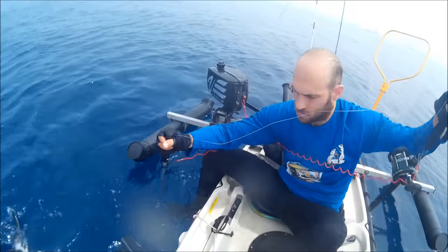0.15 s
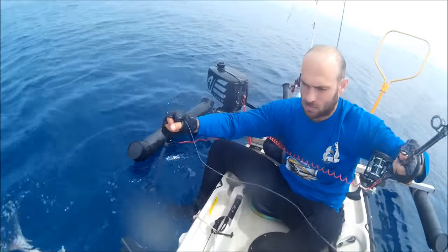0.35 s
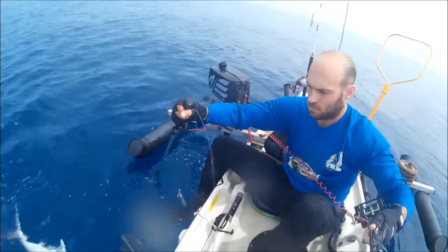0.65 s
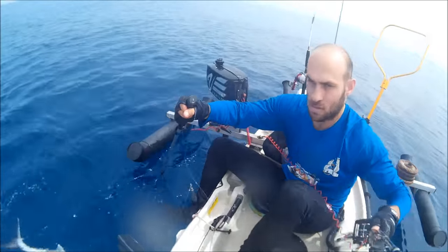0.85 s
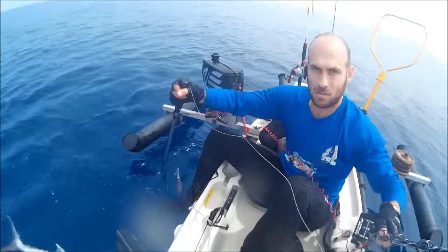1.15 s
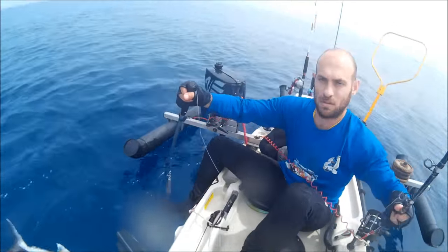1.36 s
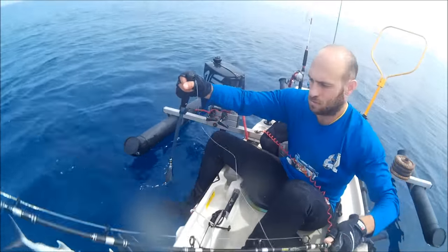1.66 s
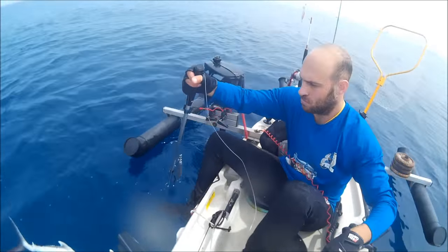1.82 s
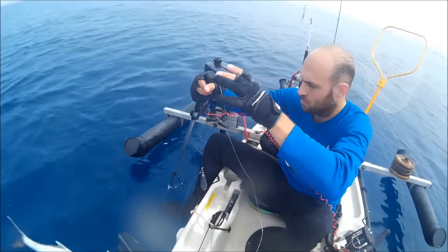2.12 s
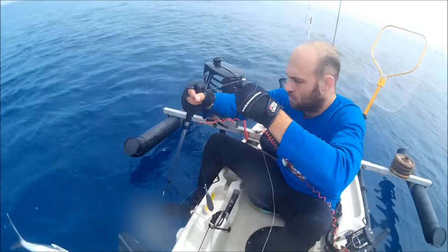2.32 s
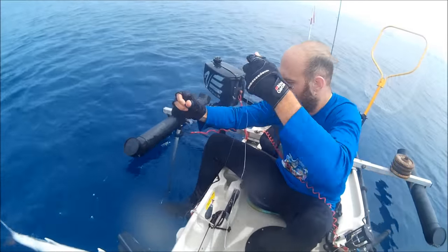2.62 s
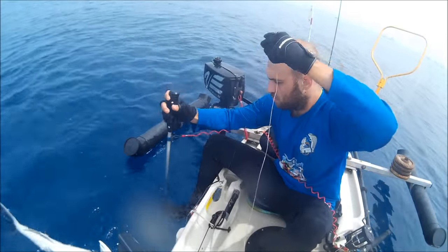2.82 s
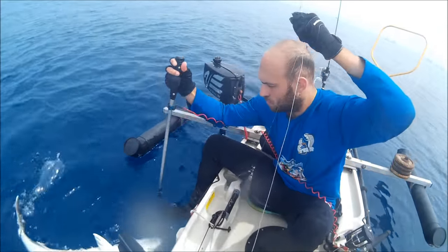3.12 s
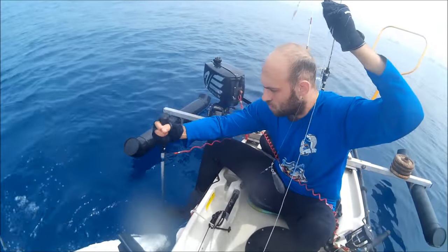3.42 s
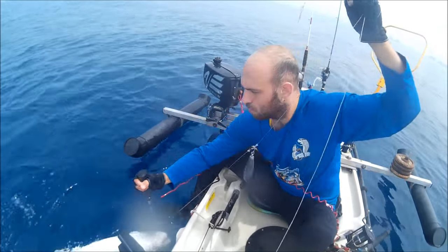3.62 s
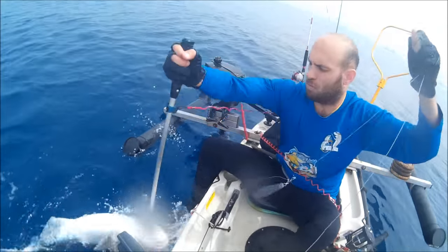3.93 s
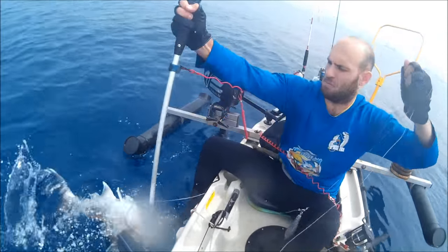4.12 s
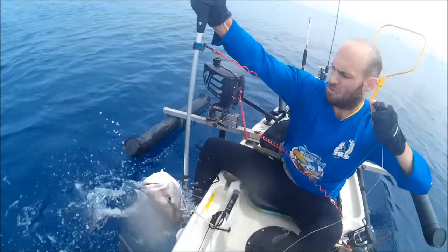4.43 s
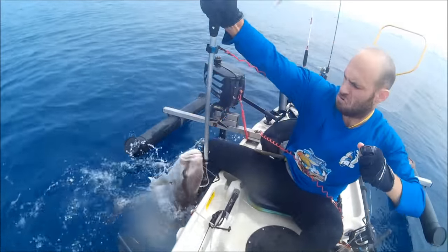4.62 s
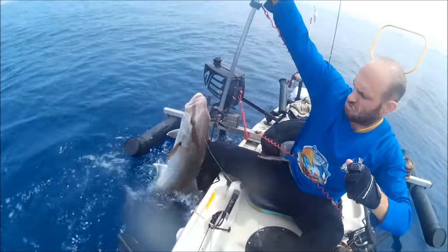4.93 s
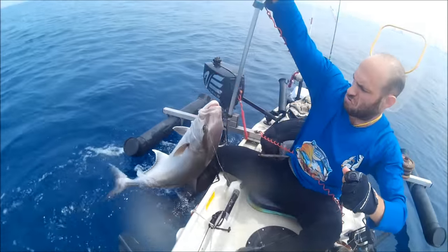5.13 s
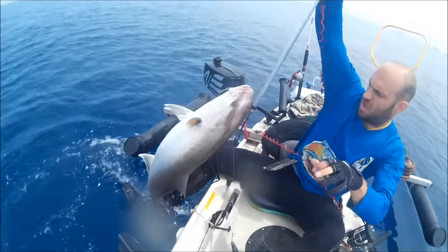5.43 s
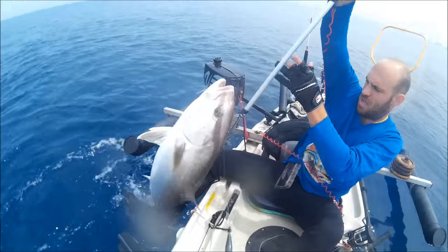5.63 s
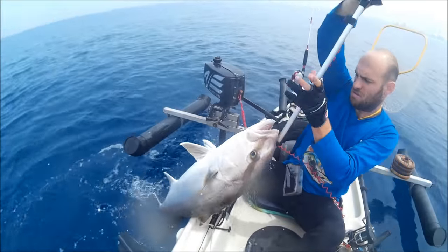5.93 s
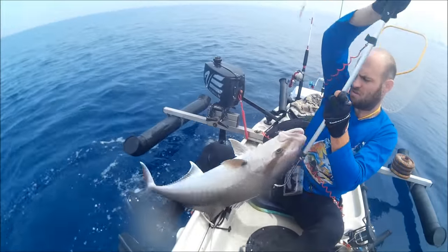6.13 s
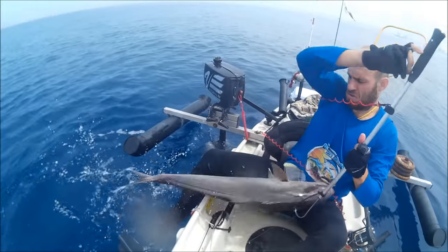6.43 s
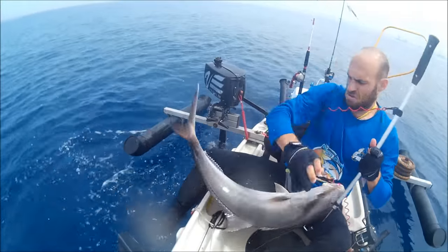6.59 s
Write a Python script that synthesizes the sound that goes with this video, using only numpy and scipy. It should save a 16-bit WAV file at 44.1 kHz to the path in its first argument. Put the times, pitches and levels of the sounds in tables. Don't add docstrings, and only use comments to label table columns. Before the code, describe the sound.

On open water, a sealed microphone fixed to a plastic kayak hears mostly through the hull. A rod and reel clatter violently, clipping the input, then the reel ratchets and bumps into place. Hollow gaff knocks thin out into near quiet with faint hiss, before line ticks, splashy rubbing and heavy fish thuds drum on the hull until the end.

```python
import sys
import numpy as np
from scipy import signal
from scipy.fft import rfft, irfft
from scipy.io import wavfile

SR = 44100
rng = np.random.default_rng(int(sys.argv[2]) if len(sys.argv) > 2 else 0)


def log_audio(samples):
    frames = np.atleast_2d(samples).T
    limited = np.clip(frames, -1, 1)
    pcm = np.round(limited * 32767).astype(np.int16)
    wavfile.write(sys.argv[1], SR, pcm)


def field_ratio(decibels):
    return 10 ** (np.asarray(decibels, dtype=float) / 20)


N = 298098

# pitch_hz, density_db
HISS_SPECTRUM = [(18, -42.5), (30, -11.5), (149, -1.5), (437, -10.5), (569, -13), (988, -17), (1220, -19.5),
                 (5000, -27), (14000, -27), (15200, -27), (16300, -43.5)]
# pitch_hz, level_db, t60_s
HULL_BOOM = [(101, -2, 0.23), (149.25, -0.5, .2), (180, -5, 0.13), (215, -8, 0.099), (268, 0.5, 0.043),
             (353, -8, 0.025), (383.7, -17.5, 0.08)]
HULL_KNOCK = [(476, -1.5, 0.13), (552, 0.5, 0.11), (622.2, -7.5, 0.078), (752.3, 5, 0.075),
              (822, -1, 0.084), (927.5, -10, 0.15)]
HULL_CLACK = [(1268, -12.5, 0.046), (1420, -11.5, 0.052), (1627, 2.5, 0.011), (1747, -2, 0.029),
              (2061, -13.5, 0.012), (2250, -19.5, 0.0042)]
HULL_SNAP = [(2590, -13.5, 0.024), (3000, -10.5, 0.0081), (3720, -7, 0.057), (4200, -14, 0.016)]
# pitch_hz, level_db, t60_s
MOUNT_BOOM = [(69.6, -11.5, 0.065), (150, 2.5, 0.058), (190.4, 1, 0.086), (280, 7.5, 0.033)]
MOUNT_KNOCK = [(366, -7.5, 0.0099), (504.5, -11, 0.062), (646.2, 4, 0.048), (750, 7.5, 0.034),
               (864, -4.5, 0.04)]
MOUNT_CLACK = [(1245, 0, 0.021), (1400, -3.5, 0.034), (1560, 0.5, 0.021), (1732, 2.5, 0.014),
               (1966, 0.5, 0.018), (2297, -5, 0.016)]
MOUNT_SNAP = [(2657, -1.5, 0.0099), (3220, 5, 0.0086), (4200, -3.5, 0.012), (5130, -13.5, 0.0055),
              (6700, -13.5, 0.0034), (10200, -14, 0.0015), (13550, -13.5, 0.001)]
# start_s, level_db, fall_db_per_s
JOLTS = [
    (0.0, -37, 76),
    (.57, -22.5, 227.5),
    (.95, -10.5, 293),
    (1.119, -30, 43),
    (1.45, -41.5, 48),
    (3.961, -56, 22),
    (6.56, -49.5, 10.0),
]
CALM_DB = (-67.5, -66.5, -76.5)
RELEASE_DB_PER_S = (700, 400.5, 502.5)
# start_s, end_s, knock_db, boom_db, clack_db
STROKES = [(0.147, 0.275, -57, -47, -61), (0.348, 0.375, -66, -54, -77), (0.437, 0.505, -71, -40.5, -79),
           (0.52, 0.768, -33.5, -34.5, -43), (0.86, 1.247, -49, -33, -55.5),
           (1.289, 1.56, -60, -43.5, -61.5), (1.592, 1.835, -40.5, -38, -42),
           (1.886, 2.279, -50.5, -45.5, -57.5), (3.31, 3.602, -59.5, -62, -67),
           (3.872, 4.259, -60, -48.5, -62.5), (3.995, 4.157, -58, -64, -55),
           (4.295, 4.593, -54.5, -51.5, -63), (4.58, 4.727, -58, -34, -76),
           (4.812, 4.97, -52.5, -50, -66.5), (4.954, 5.105, -39.5, -32.5, -63.5),
           (5.11, 5.244, -58, -48, -66), (5.243, 5.545, -44, -34.5, -64.5), (5.552, 6.007, -48, -36, -68),
           (6.031, 6.544, -59.5, -43, -69), (6.543, 6.757, -49, -46.5, -56.5)]
# start_s, fall_db_per_s, knock_db, boom_db, clack_db
SLAPS = [
    (0.0, 154.5, -47.5, -30, -47.5),
    (1.678, 81, -37, -31.5, -58),
    (2.469, 67, -61.5, -30, -69),
    (5.536, 69, -35.5, -38, -55.5),
]
# start_s, end_s, pitch_hz, width_hz,
# level_db
RASPS = [(0.526, 0.573, 2100, 500, -22), (0.927, 0.997, 3500, 3000, -45.5), (1.65, 1.68, 4350, 3870, -71),
         (2.46, 2.499, 3000, 2400, -55.5), (4.668, 4.706, 3000, 2100, -64), (5.3, 5.47, 3020, 120, -72),
         (5.38, 5.78, 1740, 1100, -69.5), (.001, 0.15, 3100, 4000, -64), (5.524, 5.595, 1940, 110, -54),
         (5.545, 5.76, 2130, 250, -68), (0.36, .52, 96, 32, -33), (0.00077, 0.11, 101, 42, -42.5),
         (1.28, 1.66, 95, 25, -37.5), (4.18, 4.25, 3100, 280, -72), (1.55, 1.86, 4400, 200, -73),
         (2.76, 2.98, 107, 43, -55.5)]
# start_s, level_db
RATCHET = [(1.293, -37), (1.321, -27), (1.3416, -35), (1.3903, -27), (1.4506, -32.5), (1.4662, -25),
           (1.484, -38), (1.535, -33), (1.5279, -26), (1.578, -36), (1.59, -34), (1.6195, -43),
           (1.652, -31), (1.672, -31), (1.708, -34.5), (1.724, -41), (1.399, -34), (1.6256, -28),
           (1.6596, -22.5), (1.7423, -37), (1.8153, -49), (1.9455, -49.5), (2.0232, -48), (2.067, -54),
           (2.1136, -45), (2.1385, -48), (2.155, -41), (2.1863, -47), (2.25, -52), (2.2694, -49),
           (2.3705, -49.5), (2.4224, -52)]
# start_s, level_db
LINE_TICKS = [(0.0064, -36.5), (0.0193, -34.5), (0.04, -36), (0.071, -41.5), (0.0936, -45), (0.113, -46),
              (0.138, -44.5), (0.171, -50), (0.2064, -63), (0.2227, -43.5), (0.247, -45), (0.272, -53),
              (0.303, -51), (0.365, -51), (3.743, -52.5), (3.9258, -47), (4.292, -49), (4.363, -45.5),
              (4.4093, -41.5), (4.486, -49.5), (4.5293, -42.5), (4.654, -54), (4.675, -45.5), (4.6883, -43),
              (6.0849, -51), (6.357, -50), (6.5554, -52)]
# start_s, knock_db, boom_db, clack_db, spot_hz
REEL_BUMPS = [(0.19, -29, -43, -40, 156), (0.271, -38, -46, -62, 166), (0.371, -43, -49, -53.5, 280),
              (1.313, -37, -23.5, -36, 233), (1.342, -34.5, -59, -27, 94.2), (1.39, -23, -22, -29, 111),
              (1.464, -27.5, -29.5, -57, 101), (1.526, -35.5, -25.5, -35, 133),
              (1.577, -27.5, -35, -31.5, 99.6), (1.626, -44, -59, -31, 96), (1.695, -26, -20, -27.5, 162),
              (1.815, -23.5, -43, -23, 154), (1.846, -24, -21, -59.5, 160.5), (2.0, -30, -58, -36.5, 163),
              (2.089, -18.5, -23, -24.5, 166.5), (2.193, -27.5, -45, -40, 236),
              (2.258, -35.5, -64, -42, 158), (1.662, -25, -25.5, -45, 198), (1.779, -27, -22, -31, 162)]
# start_s, knock_db, boom_db, clack_db, spot_hz
GAFF_BUMPS = [(2.426, -36, -42, -44, 161), (2.452, -19.5, -15, -29, 170), (2.534, -36, -21, -46.5, 165.5),
              (2.597, -29, -31, -42.5, 158), (2.686, -33, -35, -53.5, 163), (2.703, -37, -23, -63, 167.4),
              (3.02, -53, -48, -51.5, 137.3), (3.303, -39.5, -49, -52, 167.4),
              (3.786, -46.5, -68, -54.5, 145.6), (3.845, -40, -51, -47.5, 263),
              (3.899, -43, -34.5, -63, 172), (4.015, -31.5, -34.5, -69, 164.2),
              (4.063, -35, -40, -41.5, 194), (4.114, -30, -60.5, -44, 88.4),
              (4.177, -36, -35.5, -69.5, 164), (4.336, -52, -43, -40, 180), (4.357, -30, -61, -79, 156),
              (4.432, -30.5, -39, -58, 276.6), (2.611, -44, -24, -60, 155), (4.224, -46, -44, -42, 160.7),
              (4.077, -38, -54, -43, 163)]
# start_s, knock_db, boom_db, clack_db, spot_hz
FISH_BUMPS = [(4.585, -15.5, -18, -23, 164), (4.661, -25, -15.5, -47.5, 147.4),
              (4.908, -34, -39.5, -72, 278.7), (4.962, -24, -24, -60, 167), (5.228, -26, -19.5, -35.5, 164),
              (5.27, -42.5, -22.5, -45.5, 129.9), (5.36, -21.5, -20.5, -41, 167.8),
              (5.594, -21.5, -16, -33, 164), (5.686, -35, -53, -47, 175), (5.744, -22, -20, -46, 300),
              (5.821, -30, -41, -53, 185.4), (5.86, -16.5, -24, -44, 180), (5.939, -37.5, -32, -47, 188),
              (6.027, -38, -28, -53, 135), (6.159, -34.5, -28, -49, 150), (6.325, -45, -33.5, -62.5, 177.3),
              (6.367, -20, -22.5, -40.5, 238), (6.398, -31, -23.5, -52, 165),
              (6.609, -37.5, -27, -53, 158.3), (6.71, -23.5, -18.5, -42, 215),
              (4.724, -35, -29, -57.5, 157), (5.204, -35.5, -62, -60, 169.5), (5.548, -25, -31.5, -53, 168),
              (5.958, -43, -22.5, -68, 131.4), (6.472, -39, -30, -60, 135), (4.752, -44, -26.5, -71.5, 150)]
REEL_KNOCK_HZ = [846, 853, 680, 760, 764, 754, 760, 480, 795, 493, 500, 740, 760, 778, 756, 750, 770, 470,
                 801]
GAFF_KNOCK_HZ = [840, 760, 516, 455, 422, 567, 600, 760, 770, 824, 770, 764, 770, 780, 567, 783, 810, 756,
                 790, 770, 770]
FISH_KNOCK_HZ = [530, 420, 455, 804, 806, 770, 778, 715, 710, 583, 760, 751, 773, 770, 759, 760, 540, 760,
                 760, 533, 795, 754, 740, 500, 770, 760]
# start_s, pitch_hz, level_db, t60_s
ROD_PANELS = [(0.532, 3250, -9, 0.02), (0.564, 400, -5.5, .012), (.597, 750, -7.5, 0.031),
              (.598, 3100, -16.5, 0.015), (.624, 190, -10, .09), (.663, 720, -8.5, 0.08),
              (1.091, 4200, -18, .015), (1.1055, 2100, -13.5, 0.033), (1.138, 600, -21.5, 0.11),
              (1.2601, 2043, 2, 0.019), (.428, 547, -10, 0.035), (.519, 653, -5.5, 0.067),
              (.716, 680, -6, 0.077), (.877, 313, -6, 0.065), (.878, 710, -4, 0.024),
              (.906, 750, -8.5, 0.1), (.867, 1680, -17.5, .02)]
HULL_PANELS = [(2.453, 332, -14, 0.052), (2.453, 540, -18, 0.033), (2.467, 161, -15.5, .08),
               (2.086, 170, -13.5, .07), (2.701, 167.6, -21.5, .1), (5.229, 164, -16, 0.054),
               (2.533, 330, -22, 0.035), (2.6, 280, -31, 0.085), (4.587, 301, -13, .04),
               (4.661, 300, -27, .06), (4.915, 290, -32.5, 0.065), (5.362, 323, -16.5, 0.045),
               (5.363, 170, -17.5, 0.056), (5.597, 310, -23, .04), (5.744, 339, -21, 0.051),
               (5.757, 552, -24, .035), (5.862, 540, -24.5, 0.055), (5.864, 190, -24, 0.046),
               (6.368, 280, -25, .03), (6.711, 260, -26.5, 0.046), (6.712, 528, -25, .05),
               (6.713, 150, -26.5, 0.1), (6.611, 150, -30, 0.063), (0.002, 146, -25.5, 0.18),
               (1.697, 168, -22, 0.046), (2.09, 378, -32, 0.035), (2.09, 1185, -42, 0.035),
               (5.548, 760, -23, 0.043), (5.6, 722, -34, 0.051), (5.6, 164, -24, 0.077)]
# start_s, clack_db, boom_db, knock_db, spot_hz
BLOWS = [(0.4274, -3, -20, -13.5, 1603), (0.5163, 4, -13, -4.5, 1882), (0.5309, 2.5, -11, -16.5, 1400),
         (0.575, 8, -4.5, -5, 1348), (0.5868, -4, -18.5, -16.5, 1879), (0.5956, 5, -22, -22.5, 1635),
         (0.62, 5.5, -5, -3, 1568), (0.638, -5.5, -24.5, -15, 1750), (0.6625, -2, -17.5, -11, 1560),
         (0.7141, 10.5, -13, -7, 1413), (0.731, -6, -19.5, -16.5, 1400), (0.8288, -16, -29.5, -23, 1316),
         (0.8771, -2, -10, -5, 1640), (0.9045, 9.5, -22.5, -5.5, 1275), (0.918, -0.5, -25, -8, 1620),
         (0.9392, 1, -3, -5.5, 1637), (0.953, -7.5, -8, -7.5, 1280), (0.993, -17, -45, -30.5, 1560),
         (1.0807, -6.5, -7, -5, 1634), (1.105, -2.5, -16.5, -14, 1636), (1.1353, -3.5, -22.5, -22, 1560),
         (1.1974, -23.5, -29.5, -25.5, 1572), (1.26, 3, -12, -14, 1560)]
# knock_hz, snap_db, chatter_ms, t60_s
LANDINGS = [(500, -17.5, 2.6, 0.029), (649.4, -14, 4.6, 0.032), (640, -7, 3.8, 0.015),
            (620, -13.5, 1.3, 0.037), (696, -18.5, 1.5, 0.034), (760, -12, 1.2, 0.015),
            (600, -15.5, 6, 0.017), (706, -20, 4, .02), (690, -21.5, 0.86, 0.057), (646, -14, 4, .025),
            (640, -20.5, 3.4, .02), (759, -56, 2.0, 0.054), (680, -17, 6, 0.033), (830, -15, 3, 0.017),
            (770, -21.5, 1.3, .02), (783, -18, 3.0, 0.023), (600, -27.5, 1, .02), (740, -52, 3.1, 0.078),
            (717, -22, 1.6, 0.026), (746.3, -22.5, 1.5, 0.042), (533, -25.5, 1.5, 0.046),
            (775, -36, 5.6, .03), (800, -5.5, 1.6, 0.0088)]
# start_s, clack_db, knock_db, snap_db
SPOT_BLOWS = [(0.448, -37, -39.5, -62), (0.488, -48, -55, -54.5), (.458, -46, -49.5, -67),
              (.468, -54.5, -56, -60.5), (0.478, -48, -58, -61), (.944, -4.5, -11.5, -25),
              (0.549, -19, -26, -30.5), (0.563, -22, -18.5, -38.5), (0.783, -33.5, -27, -67),
              (0.811, -27.5, -30, -41), (0.856, -22, -34, -43.5), (0.865, -19, -35.5, -46),
              (0.965, -16, -13.5, -68), (1.0285, -40, -44.5, -39), (1.074, -28, -23, -57.5),
              (1.09, -3, -21, -34.5), (1.18, -24, -35, -41), (1.251, -31.5, -31.5, -35)]


def rms_one(x):
    return x / np.sqrt(np.mean(x ** 2) + 1e-20)


def band(x, low_hz, high_hz):
    edges = signal.butter(2, [low_hz, min(high_hz, 18000)], "band", fs=SR, output="sos")
    return signal.sosfilt(edges, x)


def drift(rate):
    r = np.exp(-80 * np.pi * rate / SR)
    slow = signal.lfilter([1], [1, -2 * r, r * r], rng.standard_normal(N // 40 + 1002))[1000:]
    return np.interp(np.arange(N) / 40, np.arange(len(slow)), rms_one(slow))


def ring(force, hz, t60):
    r = field_ratio(-60 / (t60 * SR))
    w = 2 * np.pi * hz / SR
    return signal.lfilter([0, np.sin(w)], [1, -2 * r * np.cos(w), r * r], force + 1e-18)


def contacts(times, chatter_ms):
    rebound_share = 0.4
    t_ms = np.arange(1800) * 1000 / SR
    rebounds = rng.standard_normal((len(times), 1800)) * (rng.random((len(times), 1800)) < .06)
    force = rebound_share * rebounds * np.exp(-t_ms / np.clip(chatter_ms, .3, 15)[:, None])
    force[:, 0] = 1
    return force / np.sqrt(np.sum(force ** 2, axis=1, keepdims=True))


def strike(modes, times, force, level_db, spot_hz=None):
    out = np.zeros(N)
    shares_db = 1.5 * rng.standard_normal((len(times), len(modes)))
    for k, (hz, mode_db, t60) in enumerate(modes):
        near_db = 0
        if spot_hz is not None:
            near_db = -9.0 * np.tanh(np.abs(np.log(hz / spot_hz)) / .15)
        gains = field_ratio(level_db + mode_db + near_db + shares_db[:, k])
        train = np.zeros(N + 1800)
        for s, f, gain in zip(times, force, gains):
            first = int(s * SR)
            train[first:first + 1800] += gain * f
        out += (-1) ** k * ring(train[:N], hz, t60)
    return out


def spot_ring(times, force, level_db, hz, t60):
    out, t = np.zeros(N + 9000), np.arange(7000) / SR
    for s, f, db, pitch, decay in zip(times, force, level_db, hz, np.broadcast_to(t60, len(times))):
        tone = field_ratio(db - 60 * t / max(decay, .004)) * np.sin(2 * np.pi * pitch * t)
        first = int(s * SR)
        out[first:first + 8799] += signal.fftconvolve(tone, f)
    return out[:N]


def hiss():
    level_db = -69
    hz = np.arange(1, N // 2 + 2) * SR / N
    points_hz, points_db = np.transpose(HISS_SPECTRUM)
    shape = field_ratio(np.interp(np.log(hz), np.log(points_hz), points_db))
    scale = np.sqrt(np.mean((shape * (hz > 2000)) ** 2))
    return field_ratio(level_db) * irfft(rfft(rng.standard_normal(N)) * shape, N) / scale


def sway():
    rise_db_per_s, rest_db = 498, -71
    push = band(rng.standard_normal(N), 35, 85)
    t = np.arange(N) / SR
    effort = field_ratio(rest_db)
    for s, level_db, fall in JOLTS:
        slope = np.where(t < s, rise_db_per_s, fall)
        effort = effort + field_ratio(level_db - slope * np.abs(t - s))
    return effort * rms_one(push)


def water_effort():
    attack_s, sag_db_per_s = 0.022, 2
    t = np.arange(0, N + 40, 40) / SR

    def rise(start):
        return np.clip((t - start) / attack_s + (start == 0), 0, 1)

    power = field_ratio(np.array(CALM_DB))[:, None] ** 2
    for start, end, *level_db in STROKES:
        held_db = -sag_db_per_s * np.clip(t - (start + end) / 2, -1, 1)
        shape_db = held_db - np.outer(RELEASE_DB_PER_S, np.clip(t - end, 0, 1))
        power = power + (rise(start) * field_ratio(np.array(level_db)[:, None] + shape_db)) ** 2
    for start, fall, *level_db in SLAPS:
        shape_db = -fall * np.abs(t - start)
        power = power + (rise(start) * field_ratio(np.array(level_db)[:, None] + shape_db)) ** 2
    knock, boom, clack = [np.interp(np.arange(N) / SR, t, np.sqrt(p)) for p in power]
    snap = field_ratio(-66.5) * (np.minimum(clack, field_ratio(-44)) / field_ratio(-52)) ** 1.3
    return knock, boom, clack, snap


def loaded(x):
    bend_ms = .35
    load, n = drift(12), np.arange(N)
    return field_ratio(1.6 * load) * np.interp(n + bend_ms * SR / 1000 * load, n, x)


def rubbing():
    sizes = field_ratio(2.2 * np.minimum(rng.exponential(1, N), 4)) * rng.choice([-1, 1], N)
    grains = (rng.random(N) < 2500 / SR) * sizes
    slosh = 0.4 * rng.standard_normal(N)
    force = (grains + slosh) * field_ratio(1.8 * drift(29))
    families = [HULL_KNOCK, HULL_BOOM, HULL_CLACK, HULL_SNAP]
    ranges_hz = [(303, 870), (123, 420), (969, 1900), (2190, 3700)]
    out = 0
    for modes, gain, (low_hz, high_hz) in zip(families, water_effort(), ranges_hz):
        body = np.zeros(N)
        for k, (hz, db, t60) in enumerate(modes):
            body += (-1) ** k * field_ratio(db) * loaded(ring(force, hz, 0.56 * t60))
        inside = band(body, low_hz, high_hz)
        out = out + gain * rms_one(band(inside, .8 * low_hz, 2.3 * high_hz))
    return out


def rasps():
    out, flutter = np.zeros(N), field_ratio(3.0 * drift(70))
    for start, end, hz, width_hz, level_db in RASPS:
        a, b = int(start * SR), int(end * SR)
        scratch = band(rng.standard_normal(SR // 2), hz - width_hz / 2, hz + width_hz / 2)[-(b - a):]
        fade = signal.windows.tukey(b - a, .4)
        out[a:b] += field_ratio(level_db) * rms_one(scratch) * fade * flutter[a:b]
    return out


def ticks():
    s, tick_db = np.transpose(sorted([*RATCHET, *LINE_TICKS]))
    force = contacts(s, 2.0 + 0.25 * (tick_db + 46.5))
    # pitch_hz, level_db, t60_s
    broad = [(2500, 4.2, 0.0046), (3500, 2.0, 0.0049), (4200, 0.5, 0.0024)]
    bright = [(5200, 0.0, 0.001), (7770, -8.5, 0.00081)]
    top = strike(bright, s, force, tick_db - 6.0 + 0.4 * (tick_db + 21.0))
    middle = strike(broad, s, force, tick_db - 4.0)
    return top + middle + strike(MOUNT_CLACK, s, force, tick_db - 6.0)


def bumps():
    groups = [REEL_BUMPS, GAFF_BUMPS, FISH_BUMPS]
    s, knock_db, boom_db, clack_db, spot_hz = np.transpose([bump for group in groups for bump in group])
    knock_hz = np.array([*REEL_KNOCK_HZ, *GAFF_KNOCK_HZ, *FISH_KNOCK_HZ])
    chatter_ms = np.repeat([4.6, 6.1, 5.5], [len(group) for group in groups])
    force = contacts(s, chatter_ms)
    thud = force * np.exp(-np.arange(1800) / 90) * 1.3
    boom = strike(HULL_BOOM, s, thud, boom_db + 4.0, spot_hz)
    boom += spot_ring(s, thud, boom_db - 4.0, spot_hz, 0.075)
    knock = strike(HULL_KNOCK, s, force, knock_db - 3.5, knock_hz)
    knock += spot_ring(s, force, knock_db - 5.0, knock_hz, 0.058)
    clack = strike(HULL_CLACK, s, force, clack_db + 4.5)
    return band(boom, 110, 690) + band(knock, 280, 976) + band(clack, 670, 4200)


def panels():
    rise_cycles = 0.42
    out, t = np.zeros(N + 7000), np.arange(7000) / SR
    for s, hz, db, t60 in [*ROD_PANELS, *HULL_PANELS]:
        swing = (1 - np.exp(-t * hz / rise_cycles)) * field_ratio(db - 60 * t / max(t60, .004))
        first = int(s * SR)
        out[first:first + 7000] += swing * np.sin(2 * np.pi * hz * t)
    return out[:N]


def rod_contacts():
    rows = [(*blow, *landing) for blow, landing in zip(BLOWS, LANDINGS)]
    for s, clack_db, knock_db, snap_db in SPOT_BLOWS:
        rows.append((s, clack_db, knock_db - 2.5, knock_db, 1600, 740.0, snap_db, 3.0, .018))
    return np.transpose(rows)


def rattle():
    s, clack_db = rod_contacts()[:2]
    # pitch_hz, level_db, t60_s
    loose = [(1020, -6.5, 0.029), (2390, 3.5, 0.0016), (3500, -5.5, 0.0059), (4640, -7.0, 0.0039)]
    force = contacts(s, np.full(len(s), 11.0))
    return strike(loose, s + 0.0092, force, np.minimum(clack_db, -3.0) - 24.0)


def rod():
    s, clack_db, boom_db, knock_db, spot_hz, knock_hz, snap_db, chatter_ms, t60 = rod_contacts()
    force = contacts(s, chatter_ms)
    boom = strike(MOUNT_BOOM, s, force, boom_db)
    knock = strike(MOUNT_KNOCK, s, force, knock_db + 4.5, knock_hz)
    knock += spot_ring(s, force, knock_db + 5.5, knock_hz, 0.027)
    clack = strike(MOUNT_CLACK, s, force, clack_db, spot_hz)
    clack += spot_ring(s, force, clack_db - 2.5, spot_hz, t60)
    snap = strike(MOUNT_SNAP, s, force, snap_db + 0.5)
    return boom + knock + clack + snap


def scene():
    struck = rod() + bumps() + ticks()
    wet = rubbing() + rasps()
    background = sway() + hiss()
    return (struck + wet + background + rattle() + panels())[None]


def band_limit(x):
    return signal.sosfilt(signal.butter(12, 16500, fs=SR, output="sos"), x)


def record(dry):
    clipped = np.clip(dry, -1.0, 1.0)
    mix = signal.sosfilt(signal.cheby2(12, 60, 16500, fs=SR, output="sos"), clipped)
    mix = mix * np.minimum(1, np.arange(N)[::-1] / 300)
    mix = np.clip(mix, -1, 1)
    return band_limit(mix)


dry = scene()
out = record(dry)
log_audio(out)
```